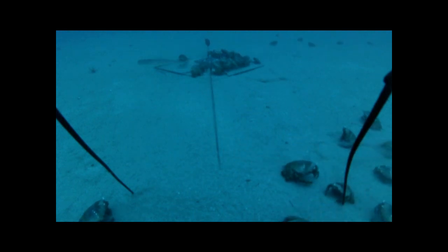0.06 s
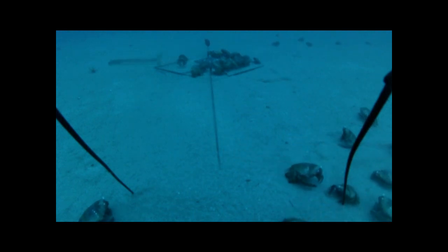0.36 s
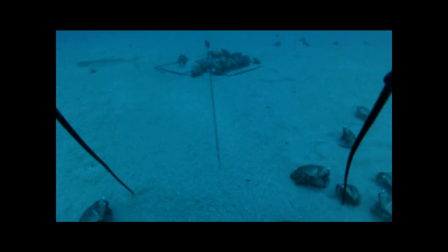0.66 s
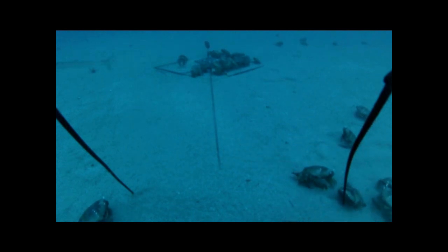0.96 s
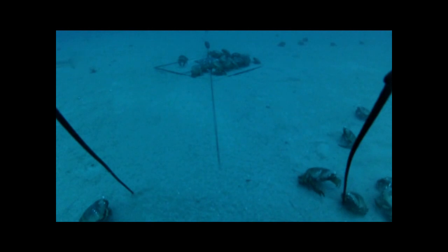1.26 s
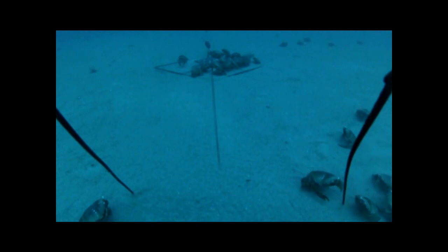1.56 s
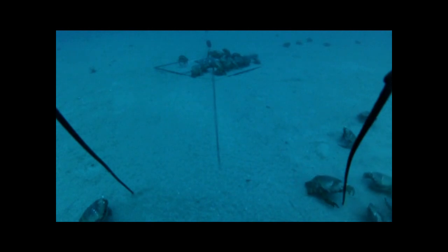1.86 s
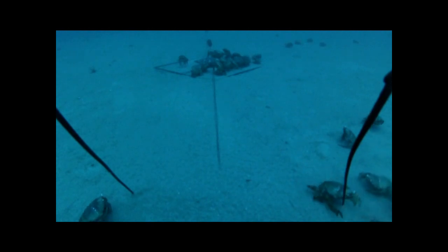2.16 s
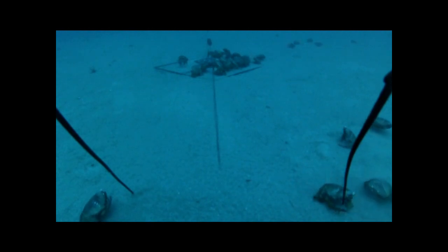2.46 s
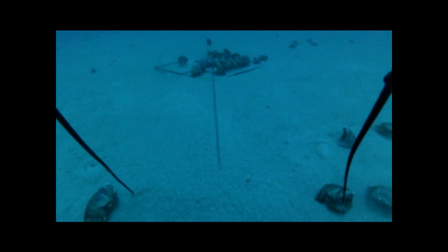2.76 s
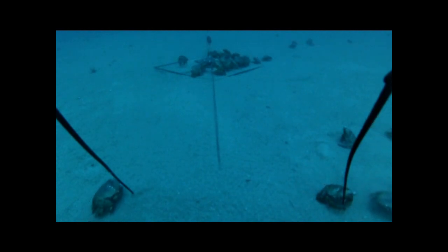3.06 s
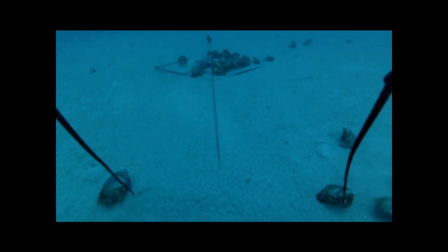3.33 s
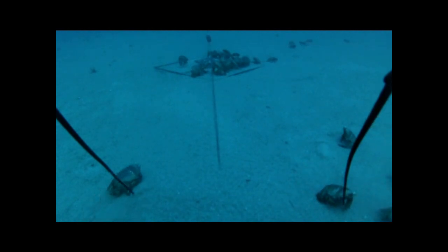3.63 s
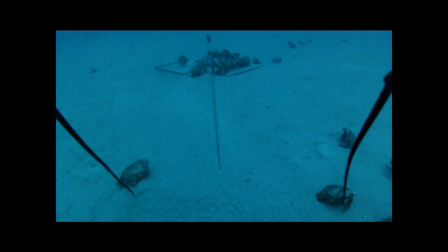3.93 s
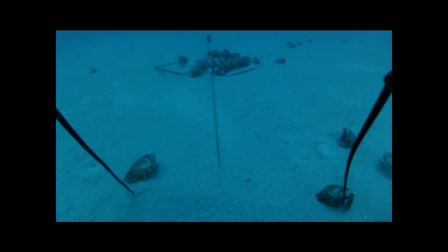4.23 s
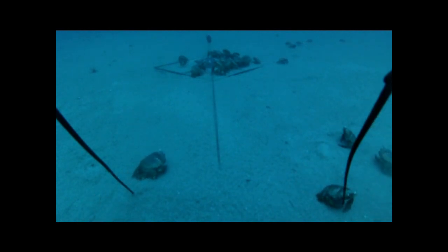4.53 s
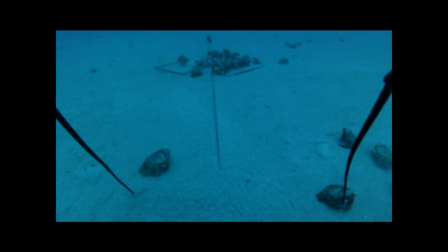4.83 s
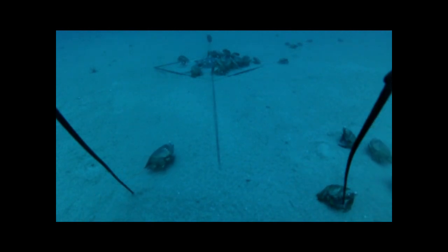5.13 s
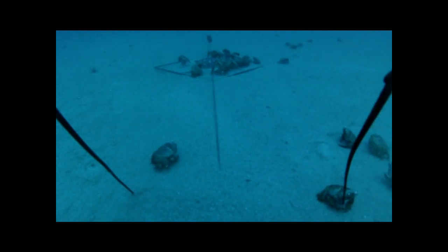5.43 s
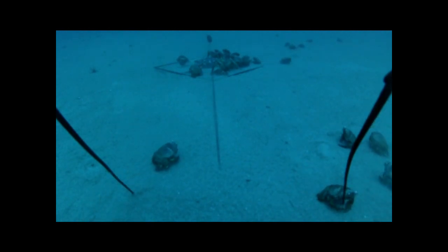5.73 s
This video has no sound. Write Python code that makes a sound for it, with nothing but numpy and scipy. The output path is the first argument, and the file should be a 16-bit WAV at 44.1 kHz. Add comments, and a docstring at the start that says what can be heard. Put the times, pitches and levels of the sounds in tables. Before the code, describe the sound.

Crabs clamber over a net rig underwater, making irregular light ticks, scrapes and knocks, with one deep ringing thump over a faint hiss.

```python
"""Light scrapes and ticks over a steady faint hiss and crackle of sand: crabs clamber over a baited net on the
seabed, heard through a camera housing fixed to its frame. Legs and shells excite the housing's modes by impact
and stick-slip friction. Leaning crabs make the frame boom and groan, a scraping shell creaks, and shoves set
the frame ringing. The recorder mirrors the bass as a thin high sizzle."""
import sys
import numpy as np
from scipy import signal
from scipy.fft import rfft, irfft
from scipy.io import wavfile
from scipy.ndimage import uniform_filter1d

SR = 44100
rng = np.random.default_rng(int(sys.argv[2]) if len(sys.argv) > 2 else 0)


def materialize(psi):
    """Save the field psi as 16-bit PCM at rate SR to the path in sys.argv[1].

    A 1-D psi becomes a single channel; in a 2-D psi each row is a channel.
    """
    bounded = np.clip(np.atleast_2d(psi).T, -1, 1)
    quanta = np.round(bounded * 32767).astype(np.int16)
    wavfile.write(sys.argv[1], SR, quanta)


N = 259749
TIME = np.arange(N) / SR
RING_TIME = TIME[:SR // 4]
REFERENCE_DB = -50  # level about which chatter and thud are scaled

# modes of the free frame: (frequency [Hz], relative level [dB], t60 before a crab damps it [s])
FRAME_MODES = [(58.8, -16, 0.87), (66.77, -10, 2.57), (81.74, -9, 2.47), (90.5, -10.5, 1.1),
               (100.9, -6.5, 0.67), (121.2, -7, 0.3), (144.64, 1, 0.74), (153.8, -2, 0.22),
               (158.6, -5, 0.73), (228.4, -7.5, 0.92), (250.7, -11.5, 0.36), (264, -10, 0.26),
               (340.3, 3, 0.14), (357.9, -0.5, 0.43), (379, -15, 1.1), (445.5, -12.5, 0.25),
               (509, -18.5, 1), (527, -22.5, 0.29), (615, -26, 0.16), (716, -12.5, 0.12), (758, -14, 0.18)]
# modes of the housing's walls: (frequency [Hz], relative level [dB], t60 [s])
WALL_MODES = [(1233, -2.5, 0.13), (1277, -5.5, 0.12), (1430, -1, 0.075), (1590, -1, 0.11),
              (1767, 2.5, 0.11), (1850, -15.5, 0.27), (1926, 1, 0.063), (1960, 0, 0.084),
              (2086, -2.5, 0.18)]
# modes of its stiffer window and fittings: (frequency [Hz], relative level [dB], t60 [s])
FITTING_MODES = [(2467, -3.5, 0.1), (2757, -4, 0.082), (2690, -31, 0.04), (3407, 0.5, 0.094),
                 (3504, 4.5, 0.027), (3591, 0, 0.1), (3940, 0.5, 0.034), (4014, -12.5, 0.081),
                 (4400, -15, 0.15), (7600, -17.5, 0.1), (8550, -14, 0.088), (8470, -3, 0.085),
                 (8600, -16.5, 0.022), (10650, -26, 0.045), (9900, -4, 0.043), (9780, -19.5, 0.24),
                 (14010, -42, .07)]
# crowds of short-lived modes around each set: (frequency [Hz], relative spectral density [dB])
WALL_SPECTRUM = [(400, -5), (750, -14), (1000, -19), (1250, 1.5), (1800, -6), (2150, 1), (2500, -35),
                 (3200, -29), (6000, -73)]
FITTING_SPECTRUM = [(1500, -11), (2300, 3.5), (3650, -2), (4200, -19), (4700, -1.5), (5500, -26.5),
                    (6400, -31), (7100, -10.5), (8500, -7), (10600, -7), (11150, -24), (12800, -34),
                    (13600, -6), (15200, -9)]
# a crab leans on the frame and lets go: (start [s], hold [s], relative boom [dB], relative groan [dB])
CRAB_LEANS = [(0.117, 0.012, -70, -50.5), (0.442, 0.013, -67, -50.5), (1.206, 0.12, -45.5, -39),
              (1.37, .18, -50, -41), (2.277, 0.023, -20.5, -31.5), (2.372, 0.037, -23, -36.5),
              (2.481, 0.1, -33.5, -44.5), (2.716, 0.18, -30, -45.5), (2.938, 0.069, -25, -41),
              (3.485, .22, -38, -57), (3.785, .06, -28, -40.5), (4.199, 0.034, -47, -56.5),
              (4.647, 0.11, -44, -65), (4.76, 0.065, -36.5, -51), (5.179, 0.019, -52, -64.5),
              (5.598, 0.032, -55, -50), (5.714, 0.0096, -64, -52)]


def from_db(db):
    """Decibels to amplitude ratio."""
    return 10 ** (np.asarray(db) / 20)


def rms_one(x):
    """Normalise to unit rms."""
    return x / np.sqrt(np.mean(x ** 2) + 1e-20)


def running_rms(x, seconds):
    """Rms envelope over a sliding window."""
    power = uniform_filter1d(x ** 2, int(seconds * SR), mode="constant")
    return np.sqrt(np.abs(power) + 1e-20)


def peak_at(db, x, seconds):
    """Scale a sound so that its rms envelope peaks at this level."""
    return from_db(db) * x / running_rms(x, seconds).max()


def cut(x, hz, kind, order=4):
    """Butterworth low- or high-pass."""
    return signal.sosfilt(signal.butter(order, hz, kind, fs=SR, output="sos"), x)


def add(out, start_s, sound):
    """Superpose a sound on the mix at a given time."""
    at = int(start_s * SR)
    out[at:at + len(sound)] += sound[:max(N - at, 0)]


def noise(spectrum, size):
    """Spectral shaping of white noise, at unit rms."""
    hz, db = np.transpose(spectrum)
    grid = np.fft.rfftfreq(size, 1 / SR) + 0.00085  # the offset keeps the logarithm finite
    gain = from_db(np.interp(np.log(grid), np.log(hz), db)) * np.minimum(grid / hz[0], 1)
    return rms_one(irfft(rfft(rng.standard_normal(size)) * gain, size))


def hiss(level_db=-62):
    """Stationary coloured noise forms an even background."""
    # background spectrum: (frequency [Hz], relative spectral density [dB])
    spectrum = [(30, -12), (60, 0.5), (110, -6), (170, -4.5), (310, -6.5), (450, -12.5), (850, -25),
                (2000, -25.5), (4000, -30), (6200, -39), (9000, -35), (12000, -47.5), (15000, -44)]
    return from_db(level_db) * noise(spectrum, N)


def slips(size, per_s, spread_db):
    """Stick-slip friction as a Poisson process: tiny impulses of uneven strength and either sign."""
    chance, strength, sign = rng.random((3, size))
    amplitude = from_db(-spread_db * np.log(np.maximum(strength, .02)))
    return (chance < per_s / SR) * amplitude * np.sign(sign - .5)


def housing_ring(modes, spectrum, vary_db=3.5, crowd_t60_s=0.052, echo_t60_s=0.2):
    """Impulse response of the housing: each point of contact favours different modes."""
    phases = rng.uniform(0, 2 * np.pi, len(modes))
    lifts_db = vary_db * rng.standard_normal(len(modes))
    partials = sum(from_db(db + lift - 60 * RING_TIME / t60) * np.sin(2 * np.pi * hz * RING_TIME + phase)
                   for (hz, db, t60), lift, phase in zip(modes, lifts_db, phases))
    echo = from_db(-11.5 - 60 * RING_TIME / echo_t60_s)  # comes back faintly from the rig
    fade = from_db(-60 * RING_TIME / crowd_t60_s) + echo
    crowd = noise(spectrum, len(RING_TIME)) * fade
    onset = 1 - np.exp(-RING_TIME / 0.00036)  # the blow takes a moment to spread through the housing
    return (rms_one(partials) + from_db(-1) * rms_one(crowd)) * onset


def sand(body_db=-73, treble_db=-74, grains_per_s=2000, fade_t60_s=0.067):
    """Shot noise: tiny impacts of sand and distant legs ring briefly in the housing as a crackle."""
    grains = slips(N + len(RING_TIME) - 1, grains_per_s, spread_db=3.5)
    fade = from_db(-60 * RING_TIME / fade_t60_s)
    body = signal.fftconvolve(grains, fade * housing_ring(WALL_MODES, WALL_SPECTRUM), "valid")
    body = cut(body, 2300, "high", order=2)
    treble = signal.fftconvolve(grains, fade * housing_ring(FITTING_MODES, FITTING_SPECTRUM), "valid")
    return from_db(body_db) * rms_one(body) + from_db(treble_db) * rms_one(treble)


def frame_ring(t, damping):
    """Impulse response of the frame: a sum of decaying modes, their decay rates multiplied by damping."""
    return sum(from_db(db - 60 * damping * t / t60) * np.sin(2 * np.pi * hz * t)
               for hz, db, t60 in FRAME_MODES)


def frame_thud():
    """Damped response of the frame to a light touch, which hardly excites its lowest modes."""
    return cut(frame_ring(RING_TIME, damping=2.15), 210, "high", order=3)


def thud_level(base_db, body_db, groan_gain, start_s, unloaded_db=-69.5):
    """Power law: a thud grows with the contact's strength and the weight coming onto the frame."""
    at = int(start_s * SR)
    lean_db = 20 * np.log10(groan_gain[at:at + SR // 20].max() + from_db(unloaded_db))
    return base_db + 0.64 * (body_db - REFERENCE_DB) + 0.62 * (lean_db - REFERENCE_DB)


def contact(force, thud, body_db, treble_db, thud_db):
    """Convolution: one force rings the walls (body), the fittings (treble) and the frame (thud)."""
    body = signal.fftconvolve(force, housing_ring(WALL_MODES, WALL_SPECTRUM))
    treble = signal.fftconvolve(force, housing_ring(FITTING_MODES, FITTING_SPECTRUM))
    low = signal.fftconvolve(force, thud)
    return peak_at(body_db, body, .008) + peak_at(treble_db, treble, .008) + peak_at(thud_db, low, .02)


def scrapes(groan_gain, gain_db=-1.86, base_thud_db=-56, catch_db=3.5, grip_points_per_s=120):
    """Sliding friction: a shell's slips swell and fade, and grow stronger wherever it catches."""
    # shells dragged over the rig: (start [s], end [s], relative body [dB], relative treble [dB])
    drags = [(0.01, 0.059, -63, -52), (0.078, 0.15, -76, -49), (0.182, 0.223, -71, -55),
             (0.457, 0.486, -44.5, -44.5), (0.599, 0.641, -59.5, -65), (0.656, 0.736, -57.5, -54.5),
             (1.04, 1.101, -56.5, -48), (1.212, 1.279, -28, -34.5), (1.281, 1.42, -46, -46),
             (1.335, 1.365, -49, -42), (1.399, 1.441, -32.5, -37.5), (1.451, 1.491, -51, -42),
             (1.479, 1.563, -41.5, -31), (2.246, 2.273, -33.5, -35), (2.595, 2.68, -62.5, -60),
             (2.723, 2.808, -54, -52.5), (2.814, 2.844, -48, -43.5), (2.913, 2.935, -57, -53.5),
             (3.406, 3.494, -54.5, -52.5), (3.975, 4.009, -51.5, -53), (4.103, 4.15, -58.5, -58),
             (4.196, 4.279, -59.5, -51.5), (5.183, 5.217, -56, -59.5), (5.248, 5.299, -61, -61),
             (5.451, 5.589, -48.5, -43.5), (5.62, 5.706, -48.5, -52), (5.868, 5.908, -49.5, -52)]
    out, thud, t = np.zeros(N), frame_thud(), TIME[:SR // 6]
    for start, end, body_db, treble_db in drags:
        along = np.clip(t / max(end - start, .01), 0, 1)
        swell = np.abs(np.sin(np.pi * along)) ** 0.33
        grip = from_db(catch_db * np.interp(t * grip_points_per_s, np.arange(64), rng.uniform(-1, 1, 64)))
        force = slips(len(t), per_s=1000, spread_db=4.0) * grip * swell
        thud_db = thud_level(base_thud_db, body_db, groan_gain, start)
        add(out, start, contact(force, thud, body_db, treble_db, thud_db))
    return from_db(gain_db) * out


def footfall(thud, body_db, treble_db, thud_db, reference_chatter_s=0.0025, doubling_db=49):
    """Contact chatter: a leg tip rattles for a few milliseconds, longer after a harder landing."""
    t = TIME[:SR // 25]
    chatter_s = reference_chatter_s * 2 ** ((body_db - REFERENCE_DB) / doubling_db)
    envelope = t / chatter_s * np.exp(-2 * t / chatter_s)
    force = slips(len(t), per_s=4000, spread_db=3.0) * envelope
    return contact(force, thud, body_db, treble_db, thud_db)


def ticks(groan_gain, gain_db=-2.6, base_thud_db=-62):
    """Impact excitation: each distinct step or knock rings the housing and the frame."""
    # leg tips landing on the rig: (time [s], relative body [dB], relative treble [dB])
    landings = [(0.1055, -52.5, -45.5), (0.1403, -51, -60), (0.457, -41, -47.5), (0.5756, -58, -56),
                (0.843, -57, -52.5), (1.0157, -63, -61), (1.0464, -60, -46.5), (1.1253, -56, -53.5),
                (1.169, -53, -43), (1.2048, -37, -42.5), (1.2512, -28, -53), (1.437, -31, -33),
                (2.249, -24.5, -24.5), (2.3043, -40.5, -42.5), (2.3696, -54, -55), (2.4043, -43.5, -54),
                (2.4865, -49.5, -48), (2.5486, -60, -57), (2.6001, -52, -59), (2.768, -58, -55.5),
                (2.815, -54, -50), (2.871, -49, -45.5), (2.9614, -61, -46), (2.9859, -53, -53),
                (3.162, -36, -38), (3.192, -24.5, -30), (3.4481, -52.5, -46.5), (3.5162, -49.5, -48.5),
                (3.5493, -43.5, -43.5), (3.5732, -50, -49.5), (3.6553, -58, -60.5), (3.7849, -45.5, -47.5),
                (3.8682, -46, -38), (4.0991, -52.5, -51.5), (4.1471, -52.5, -48), (4.8502, -64, -57.5),
                (5.179, -50, -58), (5.3598, -60.5, -55.5), (5.453, -43, -52), (5.5949, -27.5, -27),
                (5.73, -39, -51), (5.7967, -56.5, -59.5)]
    out, thud = np.zeros(N), frame_thud()
    for start, body_db, treble_db in landings:
        thud_db = thud_level(base_thud_db, body_db, groan_gain, start)
        add(out, start, footfall(thud, body_db, treble_db, thud_db))
    return from_db(gain_db) * out


def lean_gains(attack_s=0.011, boom_fall_db_per_s=82, groan_fall_db_per_s=149):
    """Envelopes of boom and groan: each lean builds, holds and decays exponentially, the groan faster."""
    boom_gain, groan_gain = np.zeros((2, N))
    for start, hold_s, boom_db, groan_db in CRAB_LEANS:
        rise_s = attack_s + 0.26 * hold_s  # a long lean builds up slowly
        rise = np.clip((TIME - start) / rise_s, 0, 1)
        released_s = np.maximum(TIME - start - attack_s - hold_s, 0)
        boom_gain = np.maximum(boom_gain, rise * from_db(boom_db - boom_fall_db_per_s * released_s))
        groan_gain = np.maximum(groan_gain, rise * from_db(groan_db - groan_fall_db_per_s * released_s))
    return boom_gain, groan_gain


def rubbed_frame(boom_gain, groan_gain, boom_trim_db=-1.15, groan_trim_db=-2.9):
    """Forced vibration: a leaning crab's friction drives the frame's modes as a boom and a higher groan."""
    ring = frame_ring(TIME[:SR], damping=1.2)  # the rubbing crab also damps them
    vibration = signal.fftconvolve(rng.standard_normal(N + SR - 1), ring, "valid")
    boom = cut(cut(vibration, 258, "low", order=6), 42.6, "high")
    groan = cut(cut(vibration, 283, "high", order=6), 450, "low", order=2)
    boom *= boom_gain / running_rms(boom, .06)
    groan *= groan_gain / running_rms(groan, .037)
    return from_db(boom_trim_db) * boom + from_db(groan_trim_db) * groan


def shuffles(steps_per_lean=2, overhang_s=0.12):
    """Weak random impacts: a crab shifts its legs during a lean or just after it."""
    out, thud = np.zeros(N), frame_thud()
    for start, hold_s, _, _ in CRAB_LEANS:
        for when, strength in rng.random((steps_per_lean, 2)):
            step = footfall(thud, body_db=-64, treble_db=-65.5, thud_db=-76)
            lift_db = 4 + 4 * strength
            add(out, start + when * (hold_s + overhang_s), from_db(lift_db) * step)
    return out


def creaks(waver=0.012):
    """Mode locking: a scraping shell's slips lock onto a mode of frame or housing in an unsteady note."""
    # hollow notes that swell and die: (start [s], end [s], frequency [Hz], peak level [dB])
    notes = [(1.24, 1.331, 357, -26.5), (1.478, 1.66, 357, -51), (1.48, 1.605, 2451, -45),
             (1.476, 1.578, 3645, -38)]
    out = np.zeros(N)
    for start, end, hz, level_db in notes:
        along = np.clip((TIME - start) / (end - start), 0, 1)
        drift = np.interp(along, np.linspace(0, 1, 6), rng.standard_normal(6))
        phase = 2 * np.pi * np.cumsum(hz * (1 + waver * drift)) / SR
        out += from_db(level_db) * np.sin(np.pi * along) * np.sin(phase)
    return out


def jolts():
    """Free vibration: a soft push sets all the frame's modes ringing, and the crab's weight damps them."""
    # shoves on the frame: (time [s], level before the high-pass [dB], contact duration [s])
    shoves = [(2.253, -20.5, 0.0017), (2.2616, -14, 0.0016), (2.273, -12.5, 0.0024), (3.787, -32, 0.0018)]
    out, ring = np.zeros(N), frame_ring(TIME[:2 * SR], damping=1.91)
    for start, level_db, contact_s in shoves:
        push = np.sin(np.pi * np.minimum(TIME[:SR // 20] / contact_s, 1)) ** 2
        add(out, start, peak_at(level_db, signal.fftconvolve(push, ring), .02))
    return cut(out, 58, "high", order=3)


def scene():
    """Superposition: all sound reaches the microphone through the sealed housing, alike in both channels."""
    boom_gain, groan_gain = lean_gains()
    contacts = ticks(groan_gain) + shuffles() + scrapes(groan_gain) + creaks()
    mono = contacts + jolts() + rubbed_frame(boom_gain, groan_gain) + sand() + hiss()
    return np.array([mono, mono])


def record(dry, clip_at=0.43, mirror_db=-19, carrier_hz=12000, cutoff_hz=15250):
    """Ring modulation mirrors the clipped sound's bass around a high carrier; a low-pass cuts the top."""
    clipped = np.clip(dry, -clip_at, clip_at)
    bass = cut(cut(clipped, 600, "low"), 600, "high", order=1)
    sizzle = from_db(mirror_db) * bass * np.cos(2 * np.pi * carrier_hz * TIME)
    low_pass = signal.ellip(8, .1, 80, cutoff_hz, fs=SR, output="sos")
    return signal.sosfilt(low_pass, clipped + sizzle)


dry = scene()
out = record(dry)
materialize(out)
```